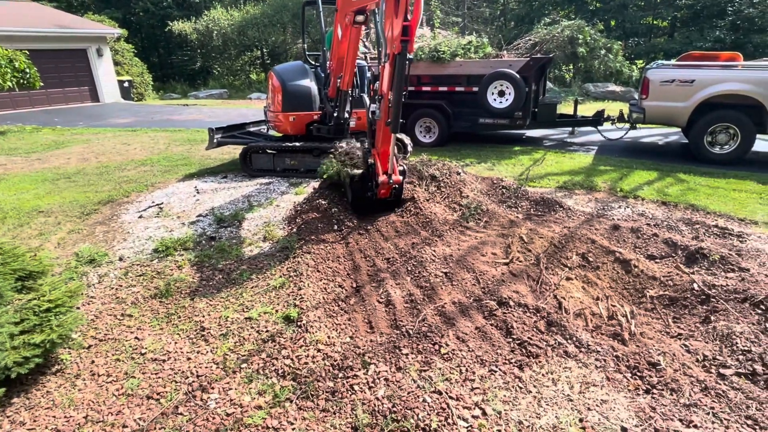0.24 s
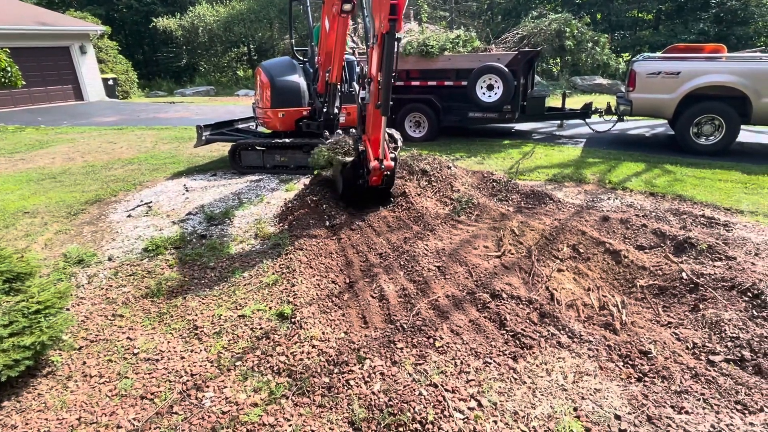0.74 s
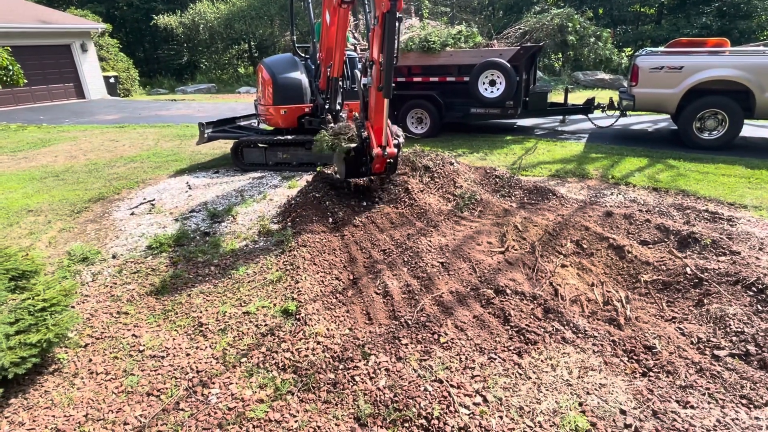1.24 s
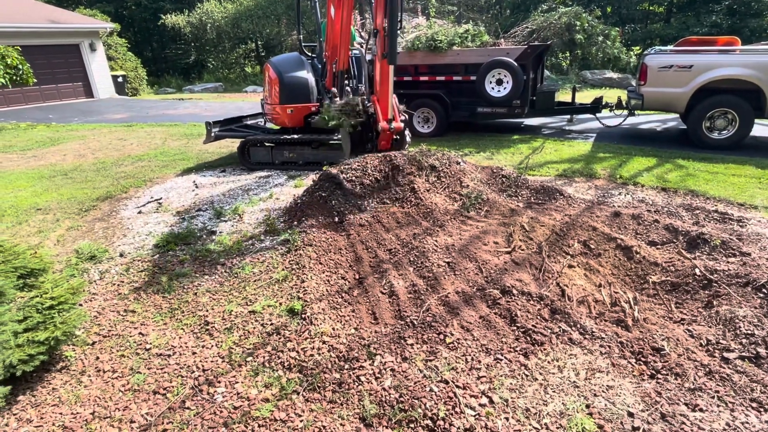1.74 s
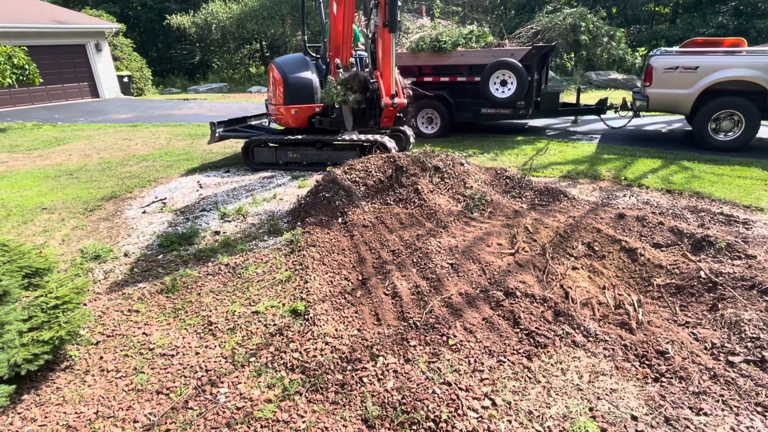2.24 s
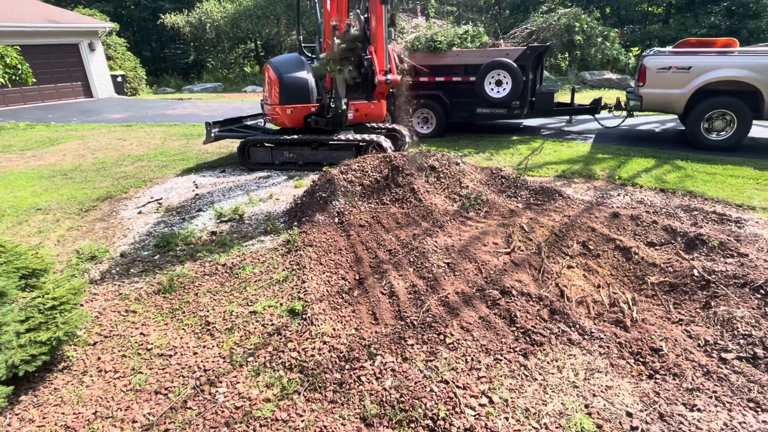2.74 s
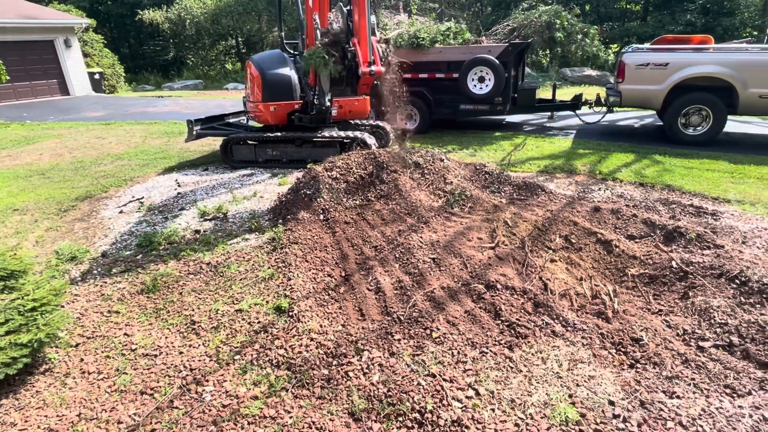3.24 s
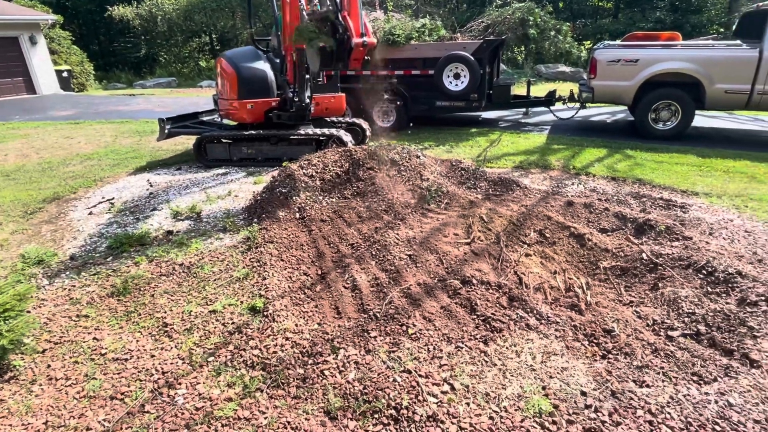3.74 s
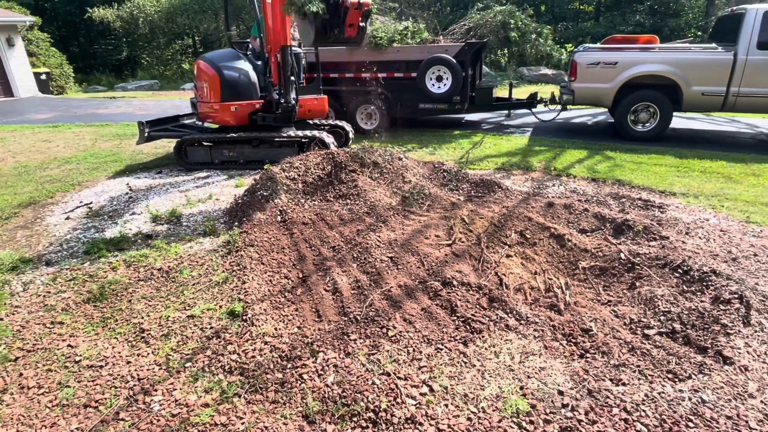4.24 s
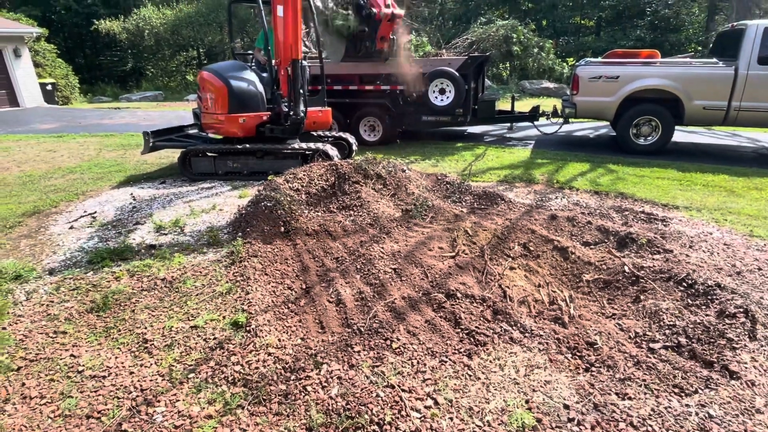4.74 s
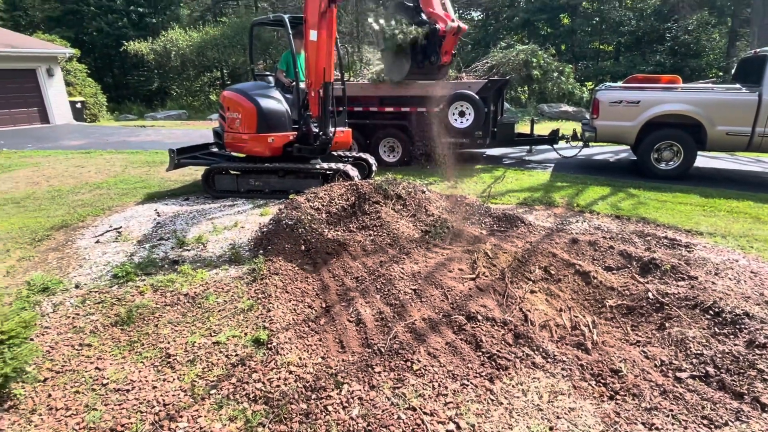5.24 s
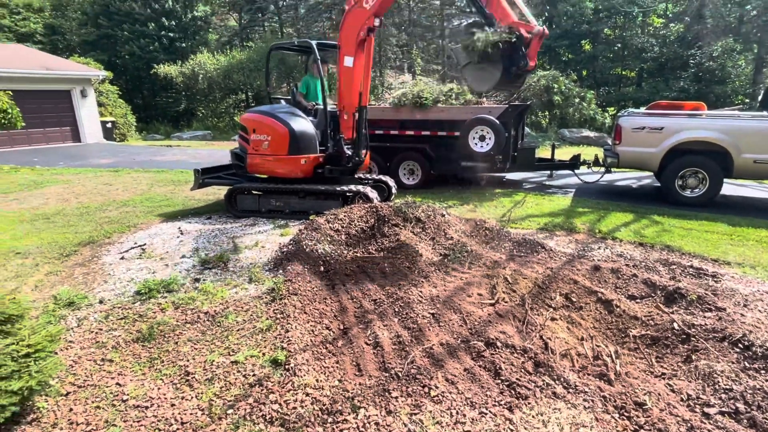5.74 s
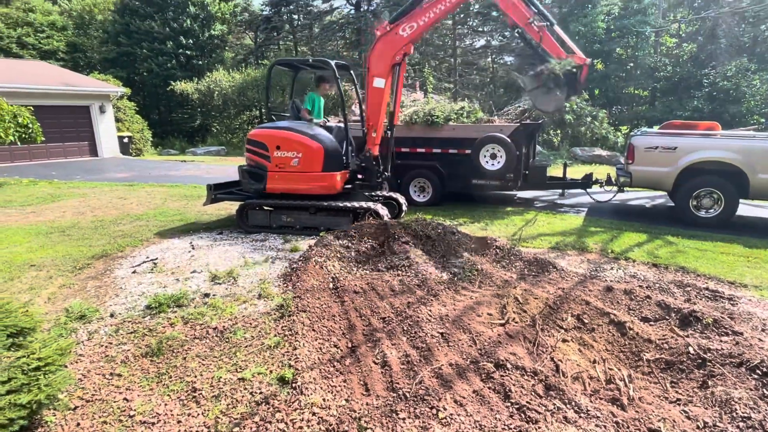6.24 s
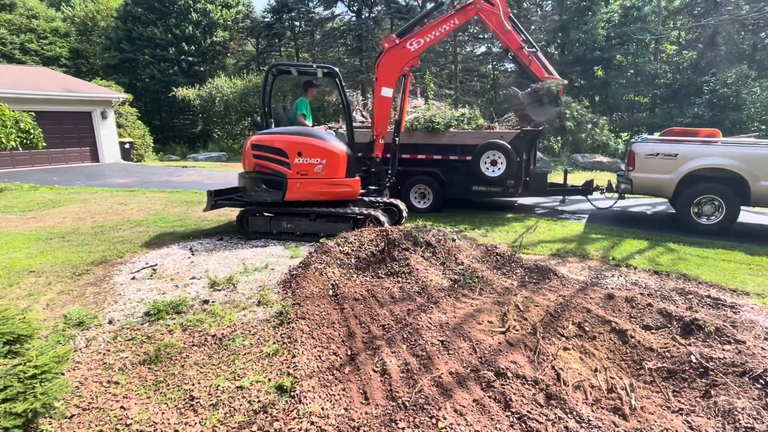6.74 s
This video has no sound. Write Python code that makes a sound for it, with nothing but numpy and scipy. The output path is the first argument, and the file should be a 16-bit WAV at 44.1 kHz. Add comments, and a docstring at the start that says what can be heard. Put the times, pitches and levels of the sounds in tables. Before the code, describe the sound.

A small diesel excavator runs throughout, a smooth low hum near 57 and 115 hertz with soft throbbing exhaust rumble, casing roar and fan hiss, heard in stereo from several metres away in an open yard. From 0 to 0.4 s the bucket gives small dull knocks; after sparse contacts, knocks and crunches thicken from 0.9 to 2.6 s, with a firm thump at 2.15 s. The loudest clattering steel bang comes at 2.67 to 2.87 s. Soil and twigs then patter in crisp, bright ticks, densest from 3 to 4.1 s and thinning until 5.6 s. A short rattle sounds around 4.36 to 4.5 s, with dull thuds near 4.9 and 5.1 s. At 5.5 s the pump whine swells and the engine sags, its hum strengthening. From 6 s to the end at 7 s the engine roar grows louder and brighter, with one soft thud at 6.2 s.

```python
"""Small excavator loading a trailer

A small excavator with a three-cylinder diesel lifts a grab of brush and soil and swings it to a trailer, in a yard.
The exhaust hums as harmonics of the firing rate, a hydraulic pump whines under load, and throbbing noise makes
the roar of exhaust, casing and fan. Bucket links knock and crunch as grainy forces on parallel resonances; soil
and twigs patter down as short noise bursts. Two microphone ports hear the scene with short echoes and a yard tail.
"""
import sys
import numpy as np
from scipy import signal
from scipy.fft import rfft, irfft, next_fast_len
from scipy.io import wavfile

SR = 44100
rng = np.random.default_rng(int(sys.argv[2]) if len(sys.argv) > 2 else 0)


def dump_mix(stems):
    """Bounce the given channels to the path in sys.argv[1] as a 16-bit WAV at rate SR."""
    frames = np.atleast_2d(stems).T  # one column per channel
    limited = np.clip(frames, -1, 1)  # hard clip at full scale
    pcm = np.round(limited * 32767).astype(np.int16)
    wavfile.write(sys.argv[1], SR, pcm)


N = 307994

# turn of the machine: (time [s], share of the engine bay side facing the ports [0 to 1])
SWING = [(0, 0.02), (5.2, 0.059), (5.7, 0.74), (6.1, 0.91), (6.98, 0.98)]
# spectrum of falling soil and twigs: (frequency [Hz], relative density [dB per Hz])
SOIL_SPECTRUM = [(1760, -37), (3000, -4.5), (4320, -3.5), (5520, -4.5), (7150, 1.5), (9140, -5.5),
                 (10500, 2.5), (13000, -9), (14500, -7), (16000, -23)]


def from_db(db):
    """Amplitude ratio: a level of 20 dB is a factor of ten."""
    return 10 ** (np.asarray(db) / 20)


def rms_one(x):
    """Normalisation of signal power: scale to rms 1."""
    return x / np.sqrt(np.mean(x ** 2) + 1e-20)


def in_time(rows):
    """Linear interpolation of a curve table in time: one value a sample for each column."""
    s, *columns = np.transpose(rows)
    return [np.interp(np.arange(N) / SR, s, c) for c in columns]


def shaped(x, response):
    """Linear filtering by convolution theorem: multiply the spectrum by a response given as a function of Hz."""
    size = next_fast_len(N + SR)
    hz = np.arange(1, size // 2 + 2) * SR / size
    return irfft(rfft(x, size) * response(hz), size)[..., :N]


def coloured(x, spectrum):
    """Zero-phase spectral weighting by (Hz, dB) points, interpolated along log frequency."""
    hz, db = np.transpose(spectrum)
    return shaped(x, lambda f: from_db(np.interp(np.log(f), np.log(hz), db)))


def band(x, low_hz, high_hz):
    """Band-pass filtering with maximally flat (Butterworth) response."""
    edges = [low_hz, min(high_hz, SR / 2.2)]
    return signal.sosfilt(signal.butter(2, edges, "band", fs=SR, output="sos"), x)


def drift(rate_hz):
    """Slow random fluctuation of rms 1: noise through two equal low-pass poles at rate_hz."""
    r = np.exp(-80 * np.pi * rate_hz / SR)   # computed at every 40th sample
    noise = rng.standard_normal(N // 40 + 2002)
    slow = signal.lfilter([1], [1, -2 * r, r * r], noise)[2000:]
    return np.interp(np.arange(N) / 40, np.arange(len(slow)), rms_one(slow))


def grains(spread_db):
    """Impulsive noise: clicks of random sign, with exponentially distributed levels in dB."""
    return from_db(spread_db * np.minimum(rng.exponential(1, N), 4)) * rng.choice([-1, 1], N)


def facing_share():
    """Directivity: the share of the engine bay side that faces the ports."""
    return np.clip(in_time(SWING)[0], 0, 1)


def pump():
    """Whine level in dB by adding amplitudes: it swells as a stroke starts and sinks back to idle after it."""
    # hydraulic strokes: (start [s], length [s], level added to idle as amplitude [dB])
    strokes = [(0.542, 0.23, -40.5), (0.984, 0.25, -39), (1.354, 0.27, -38), (1.964, 0.85, -44),
               (3.54, 0.15, -38.5), (3.981, 0.46, -38.5), (5.484, 0.5, -31.5), (6.135, 0.079, -38)]
    idle_db, rise_s, fall_s, waver_db = -60.5, 0.035, 0.4, 1
    t = np.arange(N) / SR
    gain = from_db(idle_db)
    for s, length, db in strokes:
        rise = (t - s) / rise_s
        fall = 1 - (t - s - length) / fall_s
        gain = gain + from_db(db) * np.clip(np.minimum(rise, fall), 0, 1) ** 2
    return 20 * np.log10(gain) + waver_db * drift(9.0)


def hum(per_s, first_db, second_db):
    """Additive harmonic synthesis: firing orders, ten-piston pump and crank tones share one running phase."""
    # fainter tones locked to the crank: (cycles per firing, level from the front [dB], from the bay side [dB])
    crank_tones = [(8 / 3, -58, -56), (10 / 3, -52.5, -69), (15 / 3, -68, -53), (19 / 3, -63.5, -53),
                   (24 / 3, -53.5, -53.5), (40 / 3, -47.5, -47.5), (16.95, -52, -44)]
    # upper firing orders: (order, level from the front [dB], from the bay side [dB],
    # share of order 2's level swing, waver [dB])
    upper_orders = [(3, -32.5, -45.5, .9, 0.5)]
    # firing order 4: (time [s], level [dB])
    fourth = [(0.0, -51), (0.68, -58), (1.2, -41), (1.5, -42), (1.73, -40.5), (2.29, -50), (2.49, -43),
              (4.74, -44), (4.92, -45), (6.22, -45), (6.59, -37), (6.98, -41)]
    # a tone near 330 Hz that swells while the cab slews: (time [s], level [dB])
    slew_tone = [(0, -51), (4.5, -71), (4.8, -42.5), (5.3, -41), (6.1, -51), (6.3, -52), (6.98, -42)]
    # extra lead of the hum at the left port as the machine turns: (time [s], lead over the right [ms])
    turn_lead = [(0, 0.036), (2.8, 0), (3.2, 0), (4.2, 0.2), (5.2, 0.086), (6.2, 0.059), (6.98, 0.13)]
    facing = facing_share()
    half_lead_s = in_time(turn_lead)[0] / 2000
    firings = np.cumsum(per_s) / SR + per_s * half_lead_s * [[1], [-1]]
    # (cycles per firing, level in dB)
    tones = [
        (1, first_db + 1.7 * drift(7.6)),
        (2, second_db + 1.02 * drift(19.0)),
        (20 / 3, pump()),
        (4, in_time(fourth)[0] + 4.1 * drift(7.6)),
        (17 / 3, in_time(slew_tone)[0] + 1.2 * drift(3.3)),
    ]
    for k, front_db, bay_db, share, waver_db in upper_orders:
        turned_db = front_db + facing ** 4 * (bay_db - front_db)
        swing_db = share * (second_db - second_db.mean())
        tones.append((k, turned_db + swing_db + waver_db * drift(2.5)))
    for k, front_db, bay_db in crank_tones:
        tones.append((k, front_db + facing * (bay_db - front_db) + 0.74 * drift(4.2)))
    return sum(np.sqrt(2) * from_db(db) * np.cos(2 * np.pi * k * firings) for k, db in tones)


def throb(beats, pattern_db, depth):
    """Amplitude modulation: three draws of noise jump up at each beat, unevenly, and decay until the next."""
    beat = beats.astype(int)
    uneven_db = 3.1 * rng.standard_normal(int(beats[-1]) + 1)[beat]
    beat_db = np.array(pattern_db)[beat % len(pattern_db)] + uneven_db
    puff = from_db(beat_db) * np.exp(-3.2 * (beats % 1))
    return rng.standard_normal((3, N)) * (1 - depth + 0.31 * depth * puff)


def roar(firings, rumble_db, casing_db, hiss_db):
    """Modulated noise: exhaust puffs with each cylinder, pistons and valve gear slap twice a turn. Front, bay."""
    # spectra of exhaust rumble, then of casing roar and of fan and oil hiss from the front
    # and from the bay side, each (frequency [Hz], relative density [dB per Hz])
    rumble_spectrum = [(20, -30), (40, -17), (70, -6), (90, -5), (115, -4), (145, 0), (200, -3), (260, -8),
                       (400, -9), (520, -13), (620, -20), (900, -45), (1500, -100)]
    casing_spectrum, hiss_spectrum = [(260, -63), (450, -7.5), (608, -15), (633, -2), (777, 1.5),
                                      (821, -0.5), (967, -4.5), (1150, -15.5), (1480, -3.5), (1660, -3.5),
                                      (1770, -47), (1950, -44), (2300, -7), (2990, -42), (5060, -120)], [(1060, -30), (1800, -2.5), (2250, -1), (2500, -4),
                                                      (2750, -3.5), (3200, -2), (3600, -12), (4000, -9),
                                                      (4300, -9.5), (4740, -9.5), (5200, -12.5),
                                                      (5640, -13), (6180, -13.5), (7300, -17),
                                                      (9000, -24.5), (10800, -26.5), (13200, -40),
                                                      (14500, -47), (16000, -74)]
    bay_casing, bay_hiss = [(260, -37), (450, -5.5), (613, -1.5), (667, -2), (707, -0.5), (799, -4),
                            (963, 0), (1130, -10), (1220, -13), (1510, -2), (1590, -2.5), (1740, -4),
                            (1940, -25), (2100, -12.5), (2730, -55), (4620, -120)], [(1500, -42), (2050, -10), (2300, 1.5), (2600, 8.5),
                                                (2800, -8), (3050, -10), (3200, -9.5), (3400, 10),
                                                (3600, -8), (3850, -9), (4200, 1), (4500, -5.5), (4800, -2),
                                                (5100, -5.5), (5300, -10), (5900, -7), (6100, -4),
                                                (6500, -10.5), (7100, -7.5), (9000, -17.5), (13000, -27),
                                                (14500, -55)]
    slaps = firings * 4 / 3   # 1.5 firings a turn
    facing = facing_share()
    puffs = throb(firings, [.6, -2.5, -1.2], 0.047)
    rumble = from_db(rumble_db + 0.086 * drift(2.7)) * rms_one(coloured(puffs, rumble_spectrum))
    slap = throb(slaps, [9.0, -8.0, -12.0, 1.0], 0.38)
    gear = throb(slaps, [1.5, 2.0, -4.0, 11.0], 0.082)
    casing = from_db(casing_db + 1.35 * drift(11))
    hiss = from_db(hiss_db + 1.17 * drift(15.0))
    front = casing * rms_one(coloured(slap, casing_spectrum)) + hiss * rms_one(coloured(gear, hiss_spectrum))
    # the draws in reverse order, so that the two sides differ
    bay = casing * rms_one(coloured(slap[::-1], bay_casing)) + hiss * rms_one(coloured(gear[::-1], bay_hiss))
    return rumble + np.sqrt(1 - facing) * front, np.sqrt(facing) * bay


def bucket(x):
    """Modal synthesis: the steel's resonances in parallel, of alternating sign, over a flat share."""
    # bucket and grab modes: (frequency [Hz], width before the widening below [Hz], gain [dB])
    modes = [(308, 56, 1.5), (349.6, 30, 6.5), (384.7, 14, 7), (426, 32, 8), (492, 102, 4.5),
             (577, 39, 6.5), (774, 86, -5.5), (823, 27, 2.5), (893, 53, -4.5), (963, 25, -0.5),
             (995, 26, -3), (1380, 48, -6), (1445, 110, -11.5), (1626, 28, -4.5), (2230, 71, -7.5),
             (2282, 28, -2), (2460, 42, -35), (2890, 140, -10), (3290, 160, -1.5), (4080, 110, -3),
             (4030, 530, -2), (4570, 200, -14), (5090, 290, -11.5), (5200, 200, -9), (6470, 110, -10.5)]
    widening = 1.4
    out = 0.17 * x
    for k, (hz, width, db) in enumerate(modes):
        r = np.exp(-np.pi * widening * width / SR)
        zeros = np.array([1, 0, -1]) * (1 - r * r) / 2
        poles = [1, -2 * r * np.cos(2 * np.pi * hz / SR), r * r]
        out = out + (-1) ** k * from_db(db) * signal.lfilter(zeros, poles, x)
    return out


def knocks():
    """Impact excitation: a firm blow and a short rattle of contacts ring the steel in five ranges."""
    # bucket and grab knocks: (time [s], nominal level [dB], then thud, ring, clink and crunch
    # relative to it [dB], fall scale [0.8 of the 1/e time, ms])
    knock_rows = [(0.062, -32.5, 5, -16, 1.5, 4.5, 8.6), (0.14, -26, -7, -8, -10, -14, 5.7),
                  (0.163, -28, -2, -10, -3.5, -20, 9.5), (0.27, -27, 6, -17, -8, -1, 5.1),
                  (0.288, -39, -5, -4, 7, -8, 5.2), (0.357, -29.5, -4, -10, -9, -7.5, 7),
                  (0.382, -26.5, -8, -8, -15, -21, 7.9), (0.676, -39, -8, -12, -20, -23, 8.1),
                  (0.927, -26.5, 4.5, -10, -11, -23, 10), (1.022, -41, -7, -5, 3, 4, 5.5),
                  (1.098, -30, -2, -4, -6, -6, 6.7), (1.115, -27, 5, -6, -7, -7, 6.3),
                  (1.143, -29, 9, -5, -8, -26, 16), (1.193, -34.5, -1, 0, 3, -16, 12),
                  (1.325, -25, 3, -0.5, -2, -2, 14.8), (1.355, -37, -5, -10, 0, -6, 8.8),
                  (1.382, -32.5, 9, -7, -1, -4, 23), (1.424, -32, 0, -5, 4, -17, 7.9),
                  (1.478, -33, -6, -2, 3.5, -6, 8.2), (1.52, -25.5, 5, -9, -2.5, -6.5, 13.7),
                  (1.535, -30, 11, -1, -8, -14, 6.6), (1.697, -30.5, 7, 0.5, -0.5, -6.5, 26),
                  (1.733, -27, 7.5, -5, -3, -11, 6.2), (1.805, -24.5, -11, -3, -8, -20, 7.9),
                  (1.859, -40, 7, -7, 9, -8, 8.8), (1.907, -23.5, -0.5, -2.5, -4, -7.5, 20.5),
                  (2.078, -35, -2, -1, 5, -12, 6.8), (2.129, -27, -12, 3.5, 1, 4, 15.6),
                  (2.15, -16.5, 6, -6, -9, -21, 10.7), (2.176, -23, 2, -4, -8, -8, 8.8),
                  (2.221, -31, 4, 3, -1, -15, 11.7), (2.243, -28, 5, -5, -3, -24, 10),
                  (2.296, -39, 1, -11, 7.5, 4, 35), (2.338, -29, 1, 0, 1, -2, 20),
                  (2.367, -35, 11, 5, -8, -11, 8.4), (2.46, -31.5, -10, -8, -18, -2.5, 7.6),
                  (2.56, -27, -6, -3, -2, -6, 6.5), (2.667, -10.5, -7, -8, -13, -16, 11.3),
                  (2.677, -10.5, 5.5, -1, 1, -2, 10.3), (2.684, -17, 12, -3, 0, -7, 5.7),
                  (2.692, -22, -2, -6, -1, -11, 3.5), (2.705, -15.5, -1, -17, -8, -2.5, 24),
                  (2.716, -8.5, -10, -5, -9, -13, 13.2), (2.726, -9.5, -1, -9, -6, -4.5, 5.1),
                  (2.739, -24, -4, -10, 2, -10, 5.6), (2.75, -22, 4, -4, -4, -16, 5.5),
                  (2.775, -23, 4, -1, -5, -12, 7.3), (2.786, -31.5, 0, -5, 2, 1, 20),
                  (2.856, -19.5, -14, 4, -1, -3.5, 7), (2.861, -18.5, 6.5, -6, -12, -15, 4.1),
                  (2.869, -13.5, -4, -16, -15, -16, 3.5), (3.377, -37.5, 10, 8, 7, 7, 7.5),
                  (3.387, -38, -8, -8, -8, 2, 8.4), (4.173, -37, 7, -11, -21, 0, 8.8),
                  (4.358, -20, 2.5, -0.5, -4, -1.5, 14), (4.369, -24, -2, -4, -5, -11, 10),
                  (4.383, -27.5, -1, -3, -10, -10, 9.3), (4.398, -22.5, 7, -16, -8, -12, 10),
                  (4.41, -38, -9, -2, 2, 0, 7.9), (4.424, -26, -1, -7, -4, -15, 9.5),
                  (4.436, -26, 1, -4, -9, -16, 8.3), (4.476, -24, -3, 3.5, 4.5, 2.5, 10),
                  (4.487, -27.5, 3, -2, 7, -1, 7), (4.498, -21.5, 3.5, -7, -11, -9, 7.1),
                  (4.511, -41, -5, -10, -12, -15, 5.1), (4.733, -34, -13, -3, -3, -3, 10.1),
                  (4.86, -23.5, 1.5, -26, -28, -27, 12.4), (4.966, -22.5, -13, -20, -11, -15, 7.7),
                  (4.98, -38, -16, -23, -24, -13, 7.2), (5.082, -24.5, 2.5, -18, -26, -22, 10),
                  (5.117, -26, -6, -14, -22, -23, 12), (5.253, -36, -11, -15, -21, -18, 14),
                  (6.227, -34, 14.5, -13, 0, -9, 9)]
    # thud, body, ring, clink and crunch: (low edge [Hz], high edge [Hz])
    range_edges = [(270, 620), (660, 1120), (1200, 1820), (1930, 2750), (2700, 9000)]
    # the lower ranges take longer to build up, so their force starts sooner: lead of each range [s]
    early_s = [.005, .0035, .002, .001, 0]
    rise_s = 0.001484
    slowness = [1.3, 0.98, 0.96, 0.748, 0.61]   # factor on the rise time in each range
    cut = 1.15   # above 1 the rattle holds, then stops short
    force, blows = np.zeros((5, N)), np.zeros((5, N))
    t = np.arange(int(.3 * SR)) / SR
    for s, db, thud_db, ring_db, clink_db, crunch_db, fall_ms in knock_rows:
        fall = np.exp(-(t * 800 / max(fall_ms, 2)) ** cut)
        levels_db = [thud_db, 0, ring_db, clink_db, crunch_db]
        for row, blow, level_db, early, slow in zip(force, blows, levels_db, early_s, slowness):
            at = int((s - early) * SR)
            rise = 1 - np.exp(-t / (slow * rise_s))
            row[at:at + len(t)] += from_db(db + level_db - 6.0) * rise * fall
            blow[at + int(slow * rise_s * SR)] += from_db(db + level_db + 8)   # the first, firm contact
    contacts = grains(1.94) * (rng.random(N) < 6000 / SR) + 1e-9
    # first row: steady rattle, sets the scale of each range
    rung = bucket(np.vstack([contacts, contacts * force + blows]))
    out = 0
    for k, edges in enumerate(range_edges):
        steady, struck = band(band(rung[[0, k + 1]], *edges), *edges)
        out = out + struck / np.std(steady)
    return out


def patter():
    """Clustered shot noise: grains land in clumps, each a short bright click at one of four pitches."""
    # fine patter of soil: (time [s], level [dB])
    patter_level = [(1.9, -107), (2.6, -52), (2.69, -47), (2.8, -49), (3.02, -48), (3.31, -55.5),
                    (3.8, -48.5), (4.2, -60), (4.53, -53.5), (4.8, -65), (5.1, -57), (5.7, -67), (5.9, -93)]
    db, = in_time(patter_level)
    median_per_s = 220
    rate = median_per_s * from_db(7.5 * drift(11))
    born = grains(4.0) * (rng.random(N) < rate / SR) + 1e-9
    dealt = rng.integers(0, 4, N)
    clicks = 0
    for k, hz in enumerate([4730, 6940, 9800, 12100]):
        clicks = clicks + band(born * (dealt == k), hz / 1.4, hz * 5.0)
    return from_db(db) * rms_one(coloured(clicks, SOIL_SPECTRUM))


def ticks():
    """Decaying noise bursts: a sharp click and gritty rattle around a pitch, partly its own at each port."""
    # clearest ticks of soil and twigs: (time [s], peak before soil colour and gain [dB], pitch [Hz],
    # rattle decay [ms])
    tick_rows = [(2.0801, -35, 4160, 4), (2.274, -33, 4030, 4), (2.3305, -32, 4000, 4),
                 (2.813, -27, 6400, 4.4), (2.833, -26, 4030, 4.3), (2.9188, -29, 4015, 4.3),
                 (2.94, -29, 7240, 4.8), (3.001, -21.5, 11000, 4.35), (3.0324, -32, 4590, 4),
                 (3.046, -28, 4560, 5.8), (3.1103, -48, 4960, 4.1), (3.1436, -45, 4600, 3.94),
                 (3.1663, -32, 7280, 4), (3.2121, -42, 5080, 4), (3.242, -30.5, 5120, 4),
                 (3.259, -36, 6550, 4.1), (3.2664, -34, 7260, 4), (3.311, -35, 6570, 4.66),
                 (3.3165, -28.5, 7180, 4), (3.375, -26, 4660, 4), (3.3866, -28, 6520, 4),
                 (3.3944, -27, 7170, 4.7), (3.4256, -27, 7200, 4.46), (3.4364, -33, 5780, 4),
                 (3.4444, -31, 7220, 4), (3.482, -40, 7260, 4), (3.501, -25, 6570, 4.6),
                 (3.5114, -20.5, 7100, 6.1), (3.547, -32, 7910, 4), (3.5574, -33, 7200, 4),
                 (3.5972, -32, 7100, 4), (3.6055, -30, 7050, 4), (3.6254, -41, 6580, 4),
                 (3.6391, -35, 6450, 4), (3.667, -22, 7130, 4.6), (3.682, -27, 6450, 4.3),
                 (3.7098, -32, 7350, 4), (3.7284, -26, 6260, 4.5), (3.7409, -25.5, 7100, 4),
                 (3.7688, -28, 6990, 4), (3.815, -23, 5040, 4.7), (3.8432, -22.5, 6600, 6.8),
                 (3.8746, -31, 8090, 3.9), (3.898, -28, 7020, 4.7), (3.937, -27.5, 7130, 6.1),
                 (4.0043, -31, 7094, 4), (4.025, -31, 6270, 4), (4.054, -28, 4530, 4),
                 (4.2169, -38, 4340, 4), (4.2393, -33, 4800, 4), (4.3076, -36, 5340, 4),
                 (4.4024, -27, 5330, 4.4), (4.4438, -38, 4060, 4), (4.475, -30, 5150, 4),
                 (4.559, -34, 7200, 4), (4.6194, -37, 4750, 4), (4.6594, -30, 4690, 4),
                 (4.7335, -38, 5120, 4.3), (5.0129, -39, 6720, 4), (5.0484, -35, 4220, 4.4),
                 (5.058, -26, 4960, 4), (5.086, -26, 7015, 4), (5.1855, -33, 4750, 3.9),
                 (5.2122, -29.5, 6516, 4), (5.24, -36, 6750, 4), (5.2759, -34, 4960, 4),
                 (5.2919, -31, 10400, 4), (5.3258, -31.5, 4680, 4.1), (5.3334, -37, 4040, 4),
                 (5.421, -32, 4760, 3.9), (5.5054, -54, 4680, 4), (5.5366, -29.5, 5185, 3.6),
                 (5.6168, -29, 8360, 3.9), (5.6321, -28.5, 5450, 4)]
    out = np.zeros((2, N))
    t = np.arange(int(0.036 * SR)) / SR
    grit = rng.standard_normal((len(tick_rows), 3, len(t)))
    for (s, db, hz, rattle_ms), (both, *own) in zip(tick_rows, grit):
        click = both * np.exp(-t / 0.00031)
        rattle = (1.1 * both + 0.82 * np.array(own)) * np.exp(-t * 1000 / max(rattle_ms, 1))
        burst = click + 0.67 * rattle
        tick = 1.08 * band(burst, 1900, 15300) + band(burst, hz / 1.42, hz * 1.31)
        at = int(s * SR)
        out[:, at:at + len(t)] += from_db(db) * tick / np.abs(tick).max()
    return from_db(6.5) * coloured(out, SOIL_SPECTRUM)


def ports(x, lead):
    """Comb filtering: two dull echoes shape the spectrum at each port; a phase lag sets right against left."""
    # microphone ports, left and right: (echo delay [ms], echo share, second echo delay [ms], its share)
    port_echoes = [(2.027, -0.056, 0.076, 0.045), (1.06, 0.12, 0.775, 0.42)]
    echo_cut_hz = 3800

    def response(f):
        def late(ms):
            return np.exp(-2j * np.pi * f * ms / 1000)
        dull = 1 / (1 + 1j * f / echo_cut_hz)
        # only the magnitude of the comb is kept
        left, right = [np.abs(1 + dull * (g * late(d) + g2 * late(d2))) for d, g, d2, g2 in port_echoes]
        lag = np.interp(f, *np.transpose(lead))
        return np.array([left, right * np.exp(-1j * lag)])
    return shaped(x, response)


def yard(x):
    """Diffuse reverberation: house wall, trailer and trees return a decaying tail, its own in each channel."""
    t60_s, tail_db = 0.19, -18.5
    t = np.arange(int(.8 * SR)) / SR
    noise = band(rng.standard_normal((2, len(t))), 270, 4350)
    tail = noise * from_db(-60 * t / t60_s) * (t > .015)
    tail = tail / np.sqrt(np.sum(tail ** 2, axis=1, keepdims=True))
    return from_db(tail_db) * signal.fftconvolve(x[None], tail, axes=1)[:, :N]


def scene():
    """Superposition: hum and rumble reach both ports nearly alike; the rest is combed, scattered and echoed."""
    # engine speed sags under load: (time [s], firing rate [Hz], level of order 1 [dB], of order 2 [dB])
    engine = [(0, 56.67, -35, -32), (.5, 58.1, -34, -26.5), (.66, 57.42, -34, -26), (1.25, 57.62, -35, -27),
              (1.45, 57.06, -39, -25), (2.6, 56.92, -38, -24.5), (2.8, 56.84, -38, -26.5),
              (2.92, 56.87, -32, -26.5), (3.46, 57.87, -35.5, -25.5), (3.67, 57.3, -42, -21.5),
              (3.91, 57.35, -31, -25), (4.02, 57.17, -45, -22.5), (4.4, 57.02, -40, -21.5),
              (4.5, 57.78, -32.5, -26), (5.38, 58.22, -30, -23), (5.52, 57.04, -45, -19.5),
              (5.63, 56.16, -33, -16.5), (5.87, 56.52, -36, -19.5), (6.04, 57.37, -37, -20.5),
              (6.2, 57.9, -28, -22.5), (6.98, 57.55, -21.5, -24.5)]
    # broad noise: (time [s], exhaust rumble [dB], casing roar [dB], fan and oil hiss [dB])
    roar_levels = [(0, -35, -42, -47), (.9, -35.5, -42, -47.5), (2.3, -32.5, -38.5, -45.5),
                   (3.3, -34, -41, -46.5), (4.2, -35, -40.5, -47), (4.47, -30, -40, -41.5),
                   (4.95, -34.5, -39.5, -47), (5.6, -34.5, -39, -46.5), (6.15, -34.5, -35.5, -42.5),
                   (6.98, -33.5, -34, -38)]
    # sound from all round: (frequency [Hz], level relative to direct before a small gain [dB])
    scatter = [(60, 1), (300, -22), (550, -11), (1000, -3), (2500, -6), (4000, -2), (5500, -2),
               (8000, -1.5), (15000, 12.5)]
    # phase of the left port ahead of the right, each (frequency [Hz], lead [radians]):
    # hum and rumble, machine from the front, from the bay side, soil, bucket
    low_lead, front_lead, bay_lead = [(0, 0.068), (600, 0.39), (1000, 0.2)], [(0, 0), (1120, 1), (1460, 0.18), (2330, 9),
                                                        (2840, 10), (3270, 8), (3960, 14.5), (4650, 13.5),
                                                        (6550, 17.5), (9040, 22.5), (10400, 12.5),
                                                        (12900, 47), (13900, 1), (16100, 12)], [(0, 78), (430, 1), (1460, 11.5),
                                                                      (1980, 14.5), (2330, 17.5),
                                                                      (3100, 12.5), (3790, 20),
                                                                      (6460, 29.5), (8440, 37), (10400, -8),
                                                                      (13000, 50), (13600, 7),
                                                                      (15800, 22.0), (16100, 21.4)]
    soil_lead, load_lead = [(0, 0), (2000, 1.3), (9000, 1.3), (16000, 2.0)], [(0, 2), (500, -1), (950, 0.97), (1550, 0.3), (2400, 2),
                                               (4000, 1.63), (5200, 1.5), (6500, 1.5), (9000, 11),
                                               (12000, 21), (16000, 23)]
    # the bucket, left over right: (frequency [Hz], level difference [dB])
    load_pan = [(60, -0.5), (110, 0.0), (200, 13), (380, -6.5), (700, 1.0), (1290, 3), (2380, -4.5),
                (4400, 3), (8120, 2.5), (15000, -1)]

    per_s, first_db, second_db = in_time(engine)
    firings = np.cumsum(per_s) / SR
    front, bay = roar(firings, *in_time(roar_levels))   # rows: one direct draw among two scattered
    low = signal.sosfilt(signal.butter(2, 330, fs=SR, output="sos"), front[0])
    hits = knocks()
    soil = ticks() + patter()
    load = np.array([coloured(hits, np.multiply(load_pan, [1, half])) for half in (.5, -.5)])

    def split_phase(f):
        return np.exp(.5j * np.interp(f, *np.transpose(low_lead)) * [[1], [-1]])
    direct = shaped(low + hum(per_s, first_db, second_db), split_phase)
    direct = direct + ports(front[0] - low, front_lead) + ports(bay[1], bay_lead)
    direct = direct + ports(soil, soil_lead) + ports(load, load_lead)
    scattered = from_db(0.5) * coloured(front[1:] + bay[::2], scatter)
    return direct + scattered + yard(hits + from_db(13.0) * soil[0])


def record(dry):
    """Band limiting and soft saturation: the deepest bass is cut, peaks are rounded, the top is cut."""
    ceiling, cutoff_hz = 1.3, 16500
    x = signal.sosfilt(signal.butter(4, 42, "high", fs=SR, output="sos"), dry)
    rounded = ceiling * np.tanh(x / ceiling)
    return signal.sosfilt(signal.cheby2(12, 70, cutoff_hz, fs=SR, output="sos"), rounded)


dry = scene()
out = record(dry)
dump_mix(out)
```